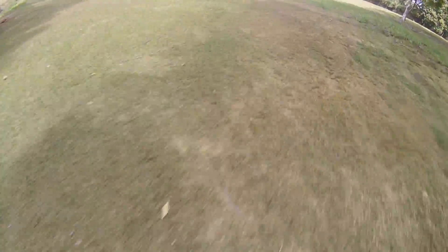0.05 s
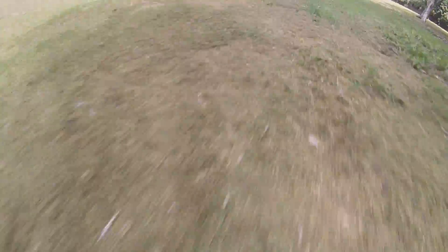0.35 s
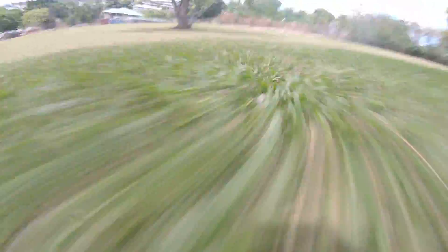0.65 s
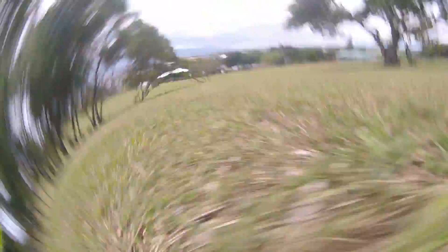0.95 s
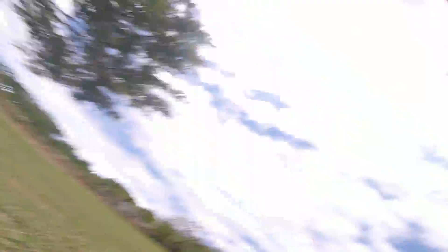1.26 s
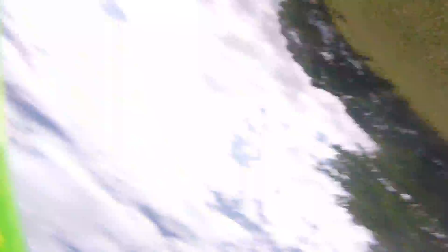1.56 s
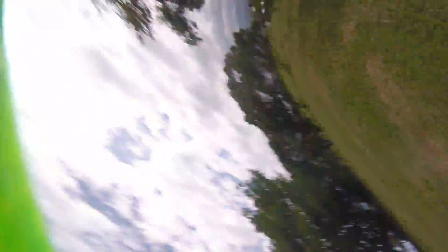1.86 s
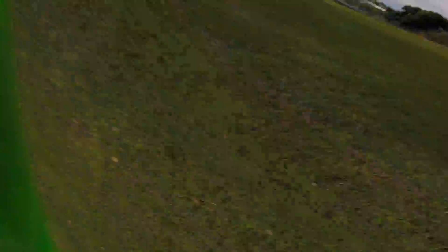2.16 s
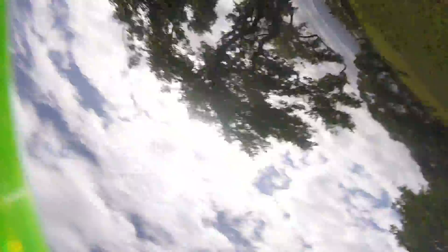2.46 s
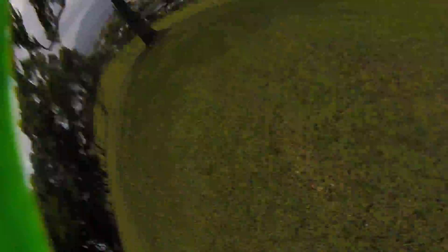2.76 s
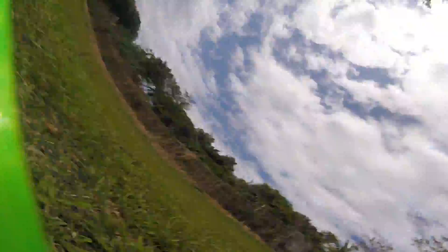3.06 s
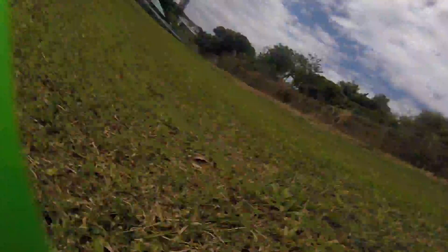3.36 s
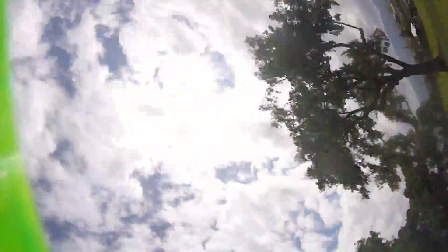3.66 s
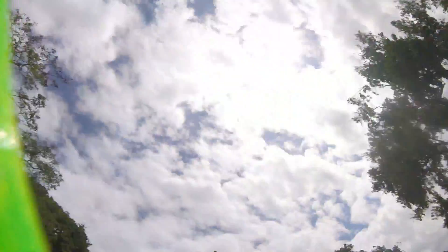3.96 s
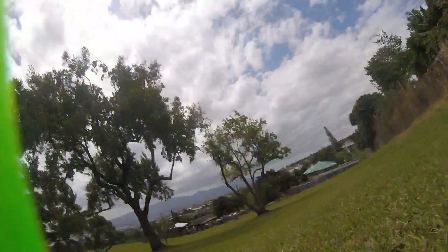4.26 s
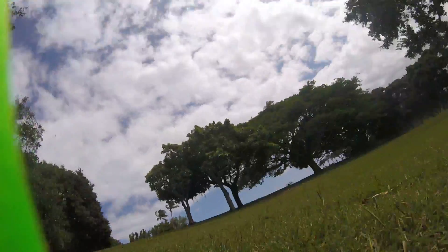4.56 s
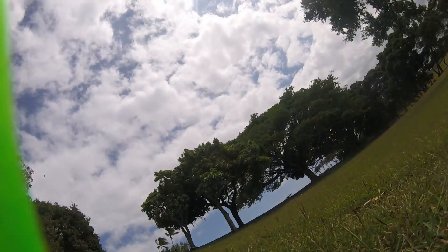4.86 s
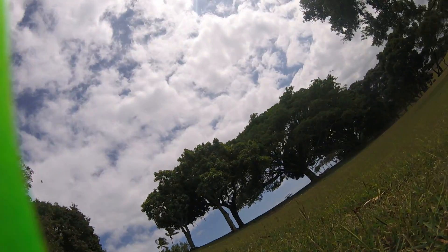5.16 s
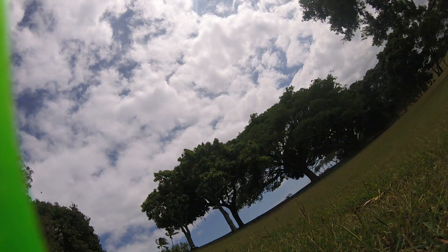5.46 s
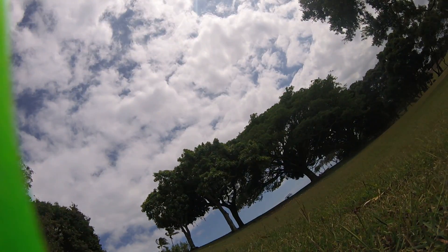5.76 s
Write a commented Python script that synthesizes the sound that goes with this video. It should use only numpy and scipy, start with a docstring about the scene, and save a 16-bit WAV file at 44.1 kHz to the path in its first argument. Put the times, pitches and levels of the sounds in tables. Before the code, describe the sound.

Heard from on board, the wavering high whine of a racing drone's four rotors drops away just before it crashes in an open field. A long tumble follows: dull thuds and sharp knocks on its plastic mount, ticking propellers, swipes of grass and low wind rumble. The later bounces leave the arms quivering. Once it lies still, only a faint far-off engine and insects remain.

```python
"""Racing quadcopter crashes in a field

Heard from its own camera, four rotors whine low over the grass and dip in level just before the crash.
The frame cartwheels: landings thump and ring its plastic mount, the arms shudder, loose propellers
tick and hiss, and air buffets the microphone. Once it lies still, a distant engine hum comes up."""
import sys
import numpy as np
from scipy import signal
from scipy.fft import rfft, irfft, next_fast_len
from scipy.io import wavfile
from scipy.ndimage import map_coordinates

SR = 44100
rng = np.random.default_rng(int(sys.argv[2]) if len(sys.argv) > 2 else 0)


def wav_out(sig):
    """Save sig, one row per channel (or a flat mono array), as 16-bit PCM at SR to the path in sys.argv[1]."""
    wavfile.write(sys.argv[1], SR, np.round(np.clip(np.atleast_2d(sig).T, -1, 1) * 32767).astype(np.int16))


N = 265006


def amp(db):
    """Decibels to gain."""
    return 10 ** (np.asarray(db) / 20)


def unit(x):
    """Scale to rms 1."""
    return x / np.sqrt(np.mean(x ** 2) + 1e-20)


def curves(rows):
    """Automation: one value per sample for each column after the time."""
    times, *columns = np.transpose(rows)
    return [np.interp(np.arange(N) / SR, times, column) for column in columns]


def wobble(rate):
    """A smooth random curve, rate knots a second."""
    return map_coordinates(rng.standard_normal(int(N * rate / SR) + 4), [np.arange(N) * rate / SR])


def filtered(x, response):
    """EQ x with a gain given as a function of frequency."""
    size = next_fast_len(len(x) + 8192)
    return irfft(rfft(x, size) * response(np.fft.rfftfreq(size, 1 / SR)), size)[:len(x)]


def noise(spectrum, grain_db=0, ring_db=0):
    """Coloured noise of rms 1, with grains grain_db deep and the mount's modes ring_db proud."""
    freqs, db = np.transpose(spectrum)
    grains = rng.standard_normal(N) * amp(grain_db * wobble(1200))
    colour_db = lambda hz: np.interp(np.log(hz + 1), np.log(freqs), db)
    peaks = lambda hz: sum(1 / (1 + ((hz / mode[0] - 1) / .05) ** 2) for mode in MOUNT_MODES)
    return unit(filtered(grains, lambda hz: amp(colour_db(hz) + ring_db * peaks(hz))))


def burst(t, attack, t60):
    """A rise and an exponential decay."""
    return (1 - np.exp(-t / attack)) * np.exp(-np.log(1000) * t / t60)


def after(s, width):
    """A smooth step from 0 to 1 at time s."""
    return .5 + .5 * np.tanh((np.arange(N) / SR - s) / width)


def add(track, s, sound):
    """Mix a sound into a track at time s."""
    part = track[round(s * SR):][:len(sound)]
    part += sound[:len(part)]


def softened(x, edge_hz):
    """Round off the top of a sharp contact."""
    return signal.sosfilt(signal.butter(3, edge_hz, fs=SR, output="sos"), x)


# How the frame passes blade overtones to the microphone: freq_hz, gain_db
FRAME_EQ = [(2400, -17), (2720, -13), (3000, -5), (3150, -4), (3340, -19), (3950, -11), (4300, -11),
            (4650, -7), (5000, -12), (5500, -16), (6200, -21), (6650, -14)]

def rotor(blade_hz, bright_db, shaft_db, flutter, frame_hz=345):
    """Four blades sing in harmonics; imbalance hums once a turn, loudest near the frame's resonance."""
    phase = 2 * np.pi * np.cumsum(blade_hz * (1 + flutter * wobble(130))) / SR
    phase += rng.uniform(0, 2 * np.pi)
    passed_db = lambda hz: np.interp(hz, *np.transpose(FRAME_EQ)) + bright_db + 1.5 * wobble(30)
    blades = np.sin(phase) + sum(amp(passed_db(k * blade_hz)) * np.sin(k * phase) for k in range(2, 5))
    imbalance = amp(shaft_db) * np.sin(phase / 4) / np.hypot(1, (blade_hz / 4 - frame_hz) / 45)
    return np.sqrt(2) * (blades + imbalance) * amp(1.2 * wobble(160))


def thrust(blade_hz, cruise_db, cruise_hz=1480, db_per_octave=6.5):
    """A rotor grows louder as it speeds up."""
    return amp(cruise_db + db_per_octave * np.log2(blade_hz / cruise_hz))


# Blade-pass whine of the fast rotor: time_s, pitch_hz
FAST_ROTOR = [(0, 1472), (.04, 1538), (.09, 1574), (.15, 1560), (.175, 1503), (.205, 1545), (.245, 1409),
              (.33, 1368), (.36, 1318), (.385, 1371), (.41, 1336), (.45, 1378), (.495, 1473), (.53, 1618),
              (.62, 1663), (.645, 1634), (.67, 1686), (.74, 1650)]
# Blade-pass whine of the slow rotor: time_s, pitch_hz, level_db
SLOW_ROTOR = [(0, 1229, -25.5), (.11, 1321, -27), (.22, 1282, -27.5), (.35, 1205, -26.5),
              (.44, 1207, -27.5), (.53, 1424, -22.5), (.6, 1494, -29.5), (.74, 1416, -27.5)]
# Turbulence off the blades: freq_hz, density_db
WASH_SPECTRUM = [(20, 3), (120, 1.5), (230, 0.5), (370, -1), (480, -4.5), (900, -9), (1400, -10.5),
                 (2200, -16.5), (3100, -14), (3700, -14), (4800, -12.5), (7000, -15.5), (8500, -31),
                 (10500, -48.5), (14500, -62)]

def flight(duck_s=.699, stall_s=.745):
    """Four rotors whine in their wash; the level drops abruptly just before they hit the ground."""
    fast_hz, = curves(FAST_ROTOR)
    slow_hz, slow_db = curves(SLOW_ROTOR)
    whine = thrust(fast_hz, -21) * rotor(fast_hz, bright_db=.5, shaft_db=-6, flutter=.0015)
    whine += amp(slow_db) * rotor(slow_hz, bright_db=-2, shaft_db=-3, flutter=.003)
    # the other two hunt about near those speeds to hold the craft level
    third_hz = fast_hz * (.975 + .012 * wobble(9))
    whine += thrust(fast_hz, -35) * rotor(third_hz, bright_db=-3, shaft_db=0, flutter=.004)
    fourth_hz = slow_hz * (.965 + .025 * wobble(8.3))
    whine += amp(slow_db - 3.5) * rotor(fourth_hz, bright_db=-4.5, shaft_db=1.5, flutter=.0072)
    wash = amp(-20.5) * noise(WASH_SPECTRUM, grain_db=1)
    full_level = 1 - after(duck_s, .00054)
    ducked = (1 - full_level) * (1 - after(stall_s, .006))
    return whine * (full_level + amp(-14.5) * ducked) + wash * (full_level + amp(-14) * ducked)


# Air over the tumbling frame, easing as the landings slow it: time_s, level_db
AIRFLOW = [(.76, -26), (1.76, -26.5), (1.88, -31), (2.42, -30.5), (2.65, -34.5), (3.3, -32.5), (3.8, -43),
           (4.05, -28.5), (4.33, -42.5), (4.55, -33), (4.9, -56), (5.3, -63.5)]
# Fast spins that swing the microphone into the wind: first_gust_s, end_s, turn_s
SPINS = [(1.153, 1.394, 0.069), (1.498, 1.777, 0.077), (1.957, 2.427, 0.084)]
# Low rumble on the microphone: freq_hz, density_db
BUFFET_SPECTRUM = [(15, -6), (32, 4.5), (60, -6.5), (120, -8), (250, -24), (500, -42.5), (1000, -105)]
# Air rushing past the frame: freq_hz, density_db
RUSH_SPECTRUM = [(60, -15), (150, 5.5), (280, 0), (400, -1), (560, -6), (800, -9), (1300, -18),
                 (2500, -28.5), (6000, -59.5)]

def wind(gust_db=2, full_flow_db=-26):
    """Air buffets the spinning frame once a turn; its rush dies away faster than the buffeting."""
    flow_db, = curves(AIRFLOW)
    t, facing = np.arange(N) / SR, np.zeros(N)
    for s, end, turn_s in SPINS:
        spinning = after(s - turn_s / 2, .012) * (1 - after(end, .0074))
        facing += spinning * np.cos(2 * np.pi * (t - s) / turn_s)
    buffet = amp(flow_db + gust_db * facing + 1.5 * wobble(22)) * noise(BUFFET_SPECTRUM)
    buffet *= 1 - after(5.34, .24)
    rush_db = -33.5 + 2.69 * (flow_db - full_flow_db) + 2.6 * wobble(35)
    rush = amp(rush_db) * noise(RUSH_SPECTRUM, grain_db=4.5, ring_db=3)
    return (buffet + rush) * after(.738, .005)


# Bright hiss of propellers and grass: freq_hz, density_db
HISS_SPECTRUM = [(500, -31), (1500, -3), (3000, 2.5), (4000, -0.5), (4700, -0.5), (5400, 3.5), (6200, -5.5),
                 (8000, -6), (10000, -35), (14000, -46.5)]

def swish():
    """A grainy hiss that comes in uneven swishes."""
    return amp(1.2 * wobble(35) + 2.5 * wobble(110)) * noise(HISS_SPECTRUM, grain_db=4.5, ring_db=4)


# Hiss of the freewheeling propellers: time_s, level_db
WINDMILL = [(.78, -43.5), (1.03, -46), (1.15, -57.5), (1.29, -42.5), (1.38, -44.5), (1.52, -54),
            (1.6, -44.5), (1.67, -58), (1.79, -55), (1.87, -73.5)]

def windmill():
    """The loose propellers hiss in the airflow until a hard landing stops them."""
    level_db, = curves(WINDMILL)
    return amp(level_db) * swish() * after(.738, .005) * (1 - after(2.5, .05))


# Ground hits: start_s, thump_db, thump_hz, t60_s, knock_db, mount_db, crunch_db
LANDINGS = [(0.742, -9, 50.46, 0.059, -3, -18.5, -13), (1.004, -24.5, 117.3, 0.085, -31, -33, -15.5),
            (1.056, -8, 107, 0.13, -24, -14.5, -33), (1.4394, -4, 107.3, 0.1, -3, -17, -17),
            (1.8216, 0, 109, .03, .5, -48, -17), (2.4892, -2, 65, 0.069, -3, -18, -30),
            (3.055, -1.5, 72.5, 0.078, -6, -16, -34), (3.293, -4, 81.2, .032, -7.5, -16, -31),
            (3.5585, -5, 101, 0.037, 1.5, -41, -33), (3.874, -4, 61.4, 0.083, -22.5, -13, -34),
            (4.0211, -4, 63, 0.097, -4.5, -18, -33.5), (4.115, -7.5, 76.4, 0.1, -19, -27, -44.5),
            (4.377, -1, 90.6, 0.062, -3.5, -19, -33.5), (4.608, -18, 65.5, 0.17, -37, -57, -58)]
# Ring of the hollow plastic camera mount: pitch_hz, level_db, t60_s
MOUNT_MODES = [(190, -3.5, .05), (259.5, 0.5, 0.049), (335.5, 1.5, 0.039), (433.7, -8.5, .04),
               (550, -13.5, 0.056), (725, -14.5, .044), (1265, -23, 0.035), (1820, -18, 0.023),
               (3990, -27, 0.022), (5230, -31.5, .02)]
# Crisp crushed grass: freq_hz, density_db
CRUNCH_SPECTRUM = [(100, -22.5), (400, 6.5), (1200, 1.5), (2400, -3.5), (4000, 0), (5500, -4.5),
                   (7500, -9.5), (10000, -23.5), (14500, -50.5)]
# Dull pressed tufts: freq_hz, density_db
TUFT_SPECTRUM = [(70, -15.5), (170, 9), (260, 9), (400, -1.5), (700, -3), (1000, -4.5), (1600, -13.5),
                 (3000, -20.5), (6000, -69)]

def landings(knock_s=.00047, deep_t60_s=.068, trail_s=.01306):
    """Each landing is a soft push of the turf, a hard knock that rings the mount and a grassy crunch."""
    body, crunch, tuft = np.zeros((3, N))
    t = np.arange(SR // 3) / SR
    knock = (1 - t / knock_s) * np.exp(-t / knock_s) * (1 - np.exp(-t / .00009))
    for s, thump_db, thump_hz, t60, knock_db, mount_db, crunch_db in LANDINGS:
        thump = amp(thump_db) * burst(t, .001208, t60) * np.sin(2 * np.pi * thump_hz * t)
        mount = np.zeros_like(t)
        for hz, db, mode_t60 in MOUNT_MODES:
            envelope = amp(db + rng.normal(0, 1.46)) * burst(t, .001, mode_t60)
            mount += envelope * np.sin(2 * np.pi * hz * rng.normal(1, .043) * t)
        add(body, s, amp(knock_db) * knock + amp(mount_db) * mount - thump)
        add(crunch, s, amp(crunch_db) * burst(t, .00087, .78 * t60))  # grass dies sooner than turf
        # reversed bursts: the grass gives way just before the frame meets the soil
        depth = min(t60 / deep_t60_s, 1) ** 2 * amp(thump_db)
        add(crunch, s - t[-1], amp(crunch_db - 13.5) * burst(t, .0003, .067)[::-1])
        add(tuft, s - t[-1], amp(-21) * depth * burst(t, .00033, .022)[::-1])
        # in a deep landing the rest of the frame ploughs in just behind
        trail = depth * burst(t, .004, .029)
        add(crunch, s + trail_s, amp(-29.5) * trail)
        add(tuft, s + trail_s, amp(-15) * trail)
    crunch *= noise(CRUNCH_SPECTRUM, grain_db=5, ring_db=-1)
    tuft *= noise(TUFT_SPECTRUM, grain_db=5, ring_db=10)
    return softened(body, edge_hz=3700) + crunch + tuft


# Hollow knock of the arms: pitch_hz, level_db, t60_s
ARM_MODES = [(680, -3, .05), (790, -1, .06), (925, -1, .06), (1180, -3, .05), (1370, -5, .05),
             (1750, -2, .05), (1950, -2, .045)]

def arms(contact, ring_db):
    """Whatever strikes or rubs the frame leaves its arms ringing."""
    t = np.arange(SR // 3) / SR
    ring = sum(amp(db) * burst(t, .002, t60) * np.sin(2 * np.pi * hz * t) for hz, db, t60 in ARM_MODES)
    ring /= np.abs(rfft(ring)).max()
    return contact + amp(ring_db) * signal.fftconvolve(contact, ring)[:N]


# Single hard swipes through tufts: start_s, crisp_db, dull_db
BRUSHES = [(0.7507, -19, -21.5), (0.801, -19, -20.5), (0.8736, -45, -18), (1.4324, -12.5, -14),
           (2.2084, -48, -25.5), (2.4746, -27, -22), (2.588, -38.5, -35), (2.9758, -40, -20.5),
           (3.172, -59.5, -28.5), (3.223, -44, -26), (3.4505, -62, -39.5), (3.9225, -30, -21),
           (4.0906, -30.5, -30), (4.148, -27, -25), (4.261, -33.5, -35), (4.5447, -38.5, -34)]

def brushes(t60=.037):
    """Tufts swipe the frame and ring the mount, singly and in cartwheeling runs."""
    crisp, dull = np.zeros((2, N))
    t = np.arange(SR // 3) / SR
    for s, crisp_db, dull_db in BRUSHES + cartwheels():
        add(crisp, s, amp(crisp_db) * burst(t, .0045, t60))
        add(dull, s, amp(dull_db) * burst(t, .0013, t60))
    crisp *= noise(CRUNCH_SPECTRUM, grain_db=4.5, ring_db=7)
    dull *= noise(TUFT_SPECTRUM, grain_db=3.5, ring_db=4)
    return crisp + dull


# Blade-pass chirp of one motor: time_s, pitch_hz, level_db
TWITCH = [(.9, 866, -55), (.95, 954, -40), (.995, 1025, -29), (1.012, 943, -33), (1.03, 900, -60)]

def twitch():
    """One motor briefly spins up again between the first two bounces."""
    hz, db = curves(TWITCH)
    running = after(.83, .01) * (1 - after(1.03, .0042))
    phase = 2 * np.pi * np.cumsum(hz * (1 + .0065 * wobble(130))) / SR
    return running * amp(db) * (np.sin(phase) + amp(-11.5) * np.sin(2 * phase))


# Hard plastic clacks as the frame strikes the ground: start_s, level_db, pitch_hz, t60_s
CLACKS = [(1.008, -22.5, 4110, .05), (2.4903, -23.5, 4740, 0.013), (2.539, -52, 4200, .015),
          (2.59, -43.5, 4260, .015), (2.837, -54, 3970, 0.016), (4.019, -27.5, 3800, 0.011),
          (4.0914, -35, 3700, .011), (4.15, -27.5, 4020, 0.0082)]

def clacks(ratios=(.91, .98, 1.03, 1.12)):
    """A stiff plastic arm rings in a short cluster of modes."""
    out, t = np.zeros(N), np.arange(SR // 8) / SR
    for s, db, hz, t60 in CLACKS:
        modes = sum(np.sin(2 * np.pi * hz * ratio * t + rng.uniform(0, 2 * np.pi)) for ratio in ratios)
        add(out, s, amp(db) * burst(t, .0002, t60) * modes)
    return out


# Blades catching the frame: start_s, level_db
TICKS = [(1.0856, -32), (1.1453, -34.5), (1.2005, -33.5), (1.253, -28), (1.293, -29), (1.3274, -29),
         (1.3655, -33), (1.4145, -21.5), (1.4827, -26.5), (1.534, -34), (1.5882, -30.5), (1.6082, -34.5),
         (1.698, -39.5)]
# Thin, bright edge of a tick: freq_hz, density_db
TICK_SPECTRUM = [(3000, -29), (6400, 5), (7300, 11.5), (8200, -1.5), (10000, -22), (14000, -45.5)]

def ticks():
    """Loose blades tick against the frame, each with a short scrape under it."""
    tick, scrape = np.zeros((2, N))
    t = np.arange(SR // 3) / SR
    for s, db in TICKS:
        add(tick, s, amp(db) * burst(t, .0012, .023))
        add(scrape, s, amp(db - 1) * burst(t, .00095, .044))
    return tick * noise(TICK_SPECTRUM) + scrape * noise(CRUNCH_SPECTRUM, grain_db=4.5, ring_db=7)


# Rolls over the grass:
# start_s, end_s, first_turn_s, second_arm_lag_turns, level_db, second_arm_db, growth_db_per_turn
CARTWHEELS = [(1.935, 2.4, .079, 0.399, -29, -3, 1), (2.626, 2.87, .115, .82, -26.5, -2.5, 0)]

def cartwheels(turn_stretch=1.018):
    """Two arms brush the grass in each ever slower turn; gives cues of start_s, crisp_db, dull_db."""
    cues = []
    for s, end, turn_s, lag, db, second_db, growth_db in CARTWHEELS:
        while s < end:
            contacts = [(s, db), (s + lag * turn_s, db + second_db)]
            cues += [(when, level - 17.5, level) for when, level in contacts if when < end]
            s += turn_s
            turn_s *= turn_stretch
            db += growth_db
    return cues


# Breaking stalks: start_s, level_db
SNAPS = [(2.4261, -31.5), (2.7766, -32), (3.0012, -22.5), (3.5122, -26), (4.3131, -43)]

def snaps():
    """Each dry stalk breaks with one sharp pulse."""
    out, t = np.zeros(N), np.arange(SR // 3) / SR
    for s, db in SNAPS:
        add(out, s, amp(db) * burst(t, .00005, .012))
    return softened(out, edge_hz=9800)


# Longer drags over the grass: start_s, length_s, rustle_db, hiss_db
SLIDES = [(2.5, 0.11, -50.5, -63), (3.082, 0.28, -50.5, -67.5), (3.489, 0.013, -46, -56),
          (3.613, 0.12, -48, -65), (3.914, 0.026, -36, -64.5), (4.042, 0.14, -45.5, -65.5),
          (4.265, 0.017, -36.5, -55), (4.413, 0.173, -53.5, -70.5), (4.659, 0.15, -54, -66)]
# Grass rubbing along the frame: freq_hz, density_db
RUSTLE_SPECTRUM = [(80, -8), (160, 3), (300, -3), (430, -4), (750, 3.5), (1000, -3.5), (1400, -12.5),
                   (1800, -14), (2600, -32), (6000, -42.5)]

def slides():
    """Between bounces the frame drags over the grass, rustling, hissing and flicking single stalks."""
    rustle, hiss = np.zeros((2, N))
    for s, length, rustle_db, hiss_db in SLIDES:
        contact = after(s, .0052) * (1 - after(s + length, .025))
        rustle += amp(rustle_db) * contact
        hiss += amp(hiss_db) * contact
    flicks = amp(21.5) * stalks()
    rustle *= amp(4.1 * wobble(45)) * noise(RUSTLE_SPECTRUM, grain_db=5, ring_db=4.5)
    return rustle + hiss * (swish() + flicks)


def stalks(per_s=55, spread_db=3):
    """Stalks flick the frame at random, each a tiny crunch of its own size."""
    flicks = np.zeros(N)
    for place, size in rng.uniform(0, 1, (int(per_s * N / SR), 2)):
        flicks[int(place * N)] = amp(spread_db * (2 * size - 2.5))
    envelope = signal.fftconvolve(flicks, burst(np.arange(SR // 20) / SR, .0003, .0095))[:N]
    return envelope * noise(CRUNCH_SPECTRUM, grain_db=3, ring_db=9)


# Low quivers after the later landings: start_s, level_db, pitch_hz
SHUDDERS = [(2.508, -32.5, 105.7), (3.082, -25.5, 67.8), (3.299, -27, 69.7), (3.568, -32.5, 70.2),
            (3.895, -19, 104.1), (4.034, -18.5, 108), (4.118, -19.5, 105.2), (4.39, -18.5, 99.4),
            (4.723, -32.5, 106.7)]
# Flexing modes of the frame: pitch_ratio, level_db
FRAME_MODES = [(1, 3), (2, -38), (2.75, -22.5)]

def shudders(t60_cycles=50):
    """The frame keeps quivering on its springy arms."""
    out, t = np.zeros(N), np.arange(SR) / SR
    for s, db, hz in SHUDDERS:
        ring = sum(amp(mode_db + rng.normal(0, 1)) * np.sin(2 * np.pi * hz * ratio * t)
                   for ratio, mode_db in FRAME_MODES)
        add(out, s, amp(db) * burst(t, .0024, t60_cycles / hz) * ring)
    return out


# Fader for the whole distant bed: time_s, level_db
FIELD_LEVEL = [(5, -62), (5.65, -54.5), (6, -53)]
# Harmonics of the engine's firing rate: multiple, level_db
ENGINE_ORDERS = [(1, -13), (2, -3), (3, -7.5), (4, -8.5), (5, -13.5), (6, -23)]
# Open air: freq_hz, density_db
AIR_SPECTRUM = [(25, -9.5), (60, -7), (130, -1), (260, -10), (400, -15.5), (700, -22), (1100, -32),
                (2000, -34), (5000, -41.5), (9000, -42), (14000, -61.5)]
# Thin, shrill band of insects: freq_hz, density_db
INSECT_SPECTRUM = [(5900, -38.5), (6500, 3.5), (7100, -8.5), (8500, -13), (10500, -27.5)]

def far_field(firing_hz=57.3):
    """An engine drones far off in the open air; a faint shrill of insects comes up last."""
    level_db, = curves(FIELD_LEVEL)
    phase = 2 * np.pi * np.cumsum(firing_hz * (1 + .012 * wobble(14))) / SR
    drone = sum(amp(db + 1.2 * wobble(6)) * np.sin(k * phase + rng.uniform(0, 2 * np.pi))
                for k, db in ENGINE_ORDERS)
    air = noise(AIR_SPECTRUM)
    insects = amp(-22.5) * after(5.25, .12) * noise(INSECT_SPECTRUM)
    return amp(level_db) * (amp(2) * unit(drone) + air + insects)


def scene():
    """One microphone on the frame feeds both channels."""
    hits = arms(landings(), ring_db=-9.5)
    scrapes = arms(brushes() + ticks() + snaps() + slides(), ring_db=-4.5)
    ground = hits + scrapes + clacks() + shudders()
    mono = flight() + wind() + windmill() + ground + twitch() + far_field()
    return np.array([mono, mono])


def record(dry, ceiling=.74, top_hz=14700):
    """The camera rounds off the tallest peaks and keeps nothing above its band limit."""
    rounded = dry / (1 + np.abs(dry / ceiling) ** 8) ** (1 / 8)
    return np.array([filtered(side, lambda hz: hz < top_hz) for side in rounded])


dry = scene()
out = record(dry)
wav_out(out)
```